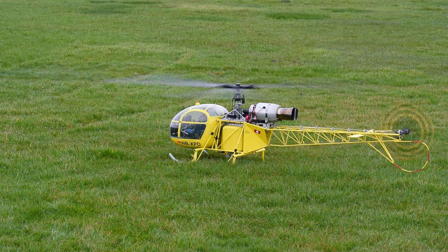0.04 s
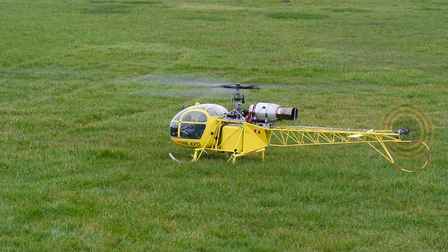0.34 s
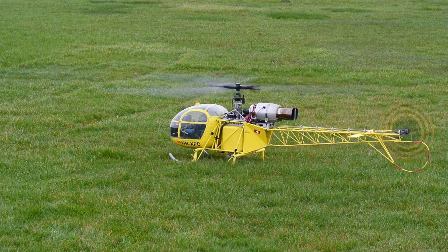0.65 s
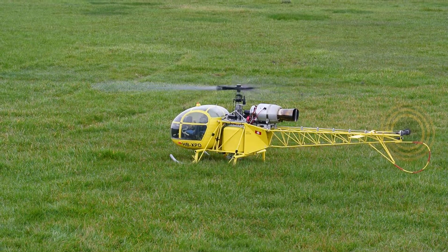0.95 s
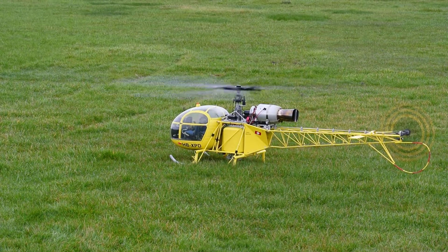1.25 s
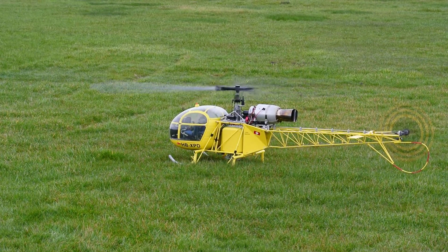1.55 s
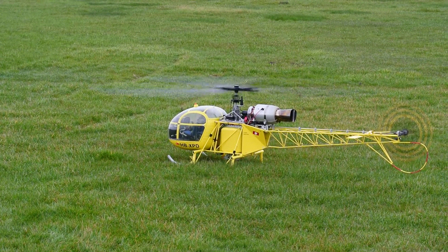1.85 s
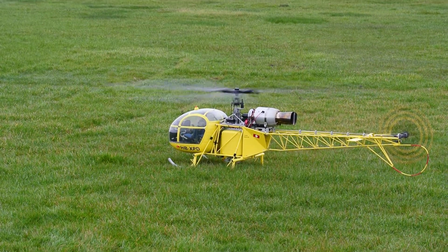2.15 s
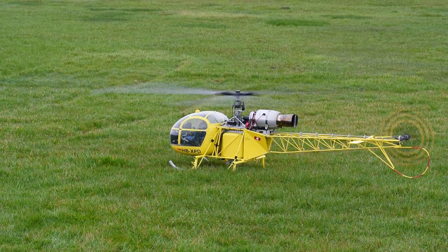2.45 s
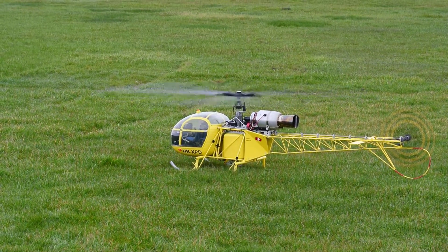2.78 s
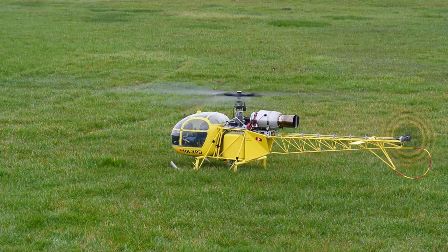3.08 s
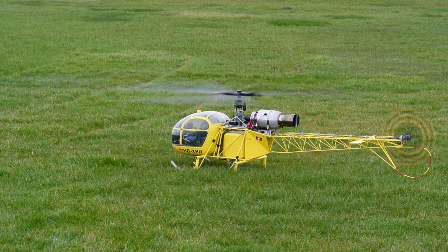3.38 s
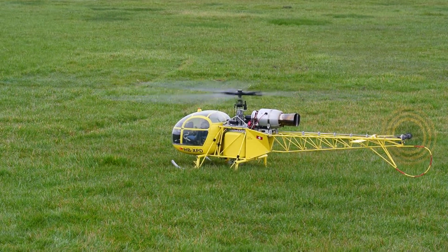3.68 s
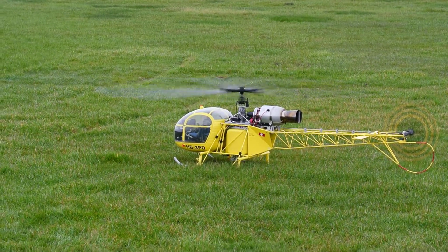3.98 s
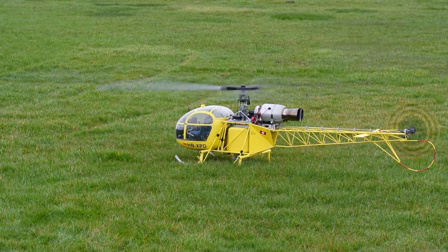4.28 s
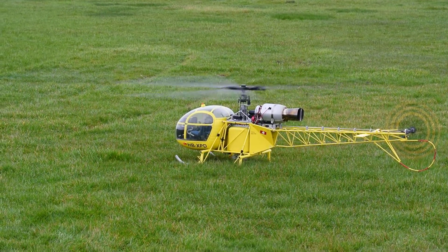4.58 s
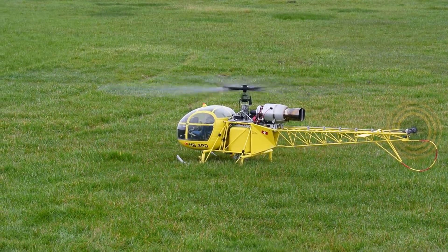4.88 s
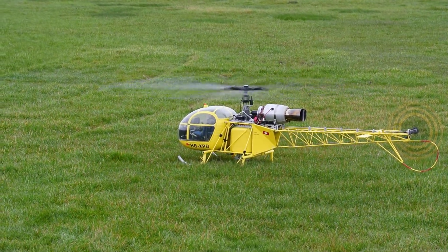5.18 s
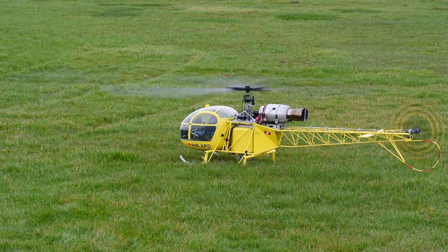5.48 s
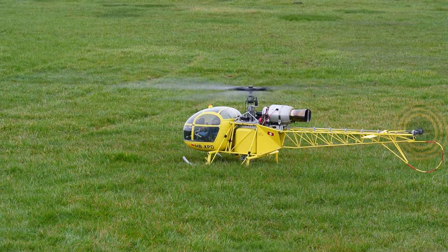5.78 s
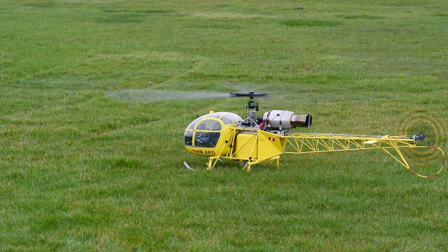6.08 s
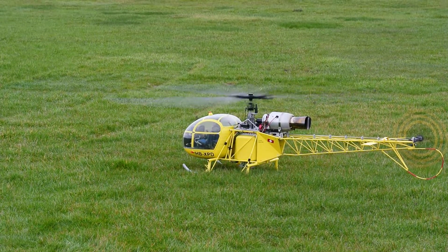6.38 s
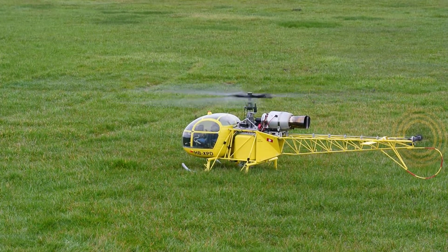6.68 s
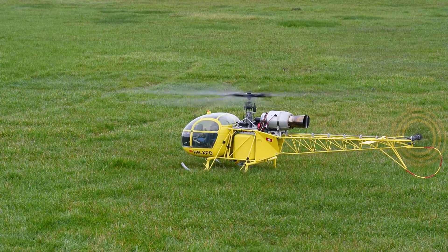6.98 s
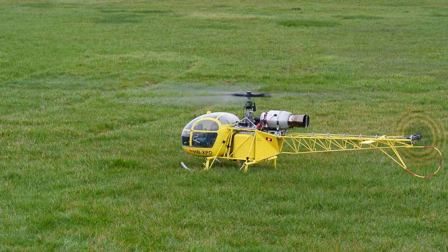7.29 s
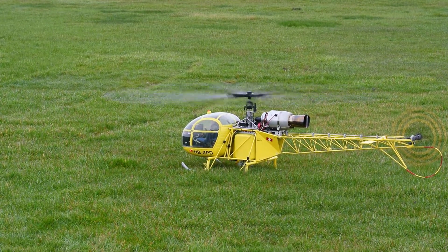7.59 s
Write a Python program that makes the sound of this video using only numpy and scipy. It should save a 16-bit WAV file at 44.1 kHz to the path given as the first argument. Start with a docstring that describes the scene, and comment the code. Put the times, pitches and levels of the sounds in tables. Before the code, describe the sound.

On an open field, a model helicopter's turbine gradually spools up. A continuous jet rush and airy hiss carry a shrill whistle made of a few high tones, which creep upward together from start to finish. The tones waver and trade strength, while the rush stays fairly even, barely pulsed by the rotor. It is heard from one position in front, dry and without reverberation.

```python
"""Model helicopter turbine spooling up

A model helicopter stands on a grass field while its small gas turbine slowly speeds up.
The compressor blades whine at multiples of the shaft speed, over the roar of the exhaust
and the hiss of the intake. The rotor chops the exhaust lightly, and moving air makes
every part swell and fade."""
import sys
import numpy as np
from scipy import signal
from scipy.fft import rfft, irfft, next_fast_len
from scipy.io import wavfile

SR = 44100
rng = np.random.default_rng(int(sys.argv[2]) if len(sys.argv) > 2 else 0)


def store_pcm(level_fs):
    """Save levels as 16-bit WAV."""
    pcm = np.round(np.clip(level_fs, -1, 1) * 32767).astype(np.int16)
    wavfile.write(sys.argv[1], SR, np.atleast_2d(pcm).T)


N = 341323
TIME = np.arange(N) / SR
FFT_SIZE = next_fast_len(N, True)
BIN_HZ = np.maximum(np.fft.rfftfreq(FFT_SIZE, 1 / SR), 1)


def from_db(db):
    """Turn decibels into a gain to multiply by."""
    return 10 ** (np.asarray(db) / 20)


def over_time(table):
    """Join a table's points with straight lines, giving a value for every sample."""
    times, values = np.transpose(table)
    return np.interp(TIME, times, values)


def spectrum_gain(table):
    """Join a table's levels along a pitch scale, giving a gain for every frequency."""
    hz, db = np.transpose(table)
    return from_db(np.interp(np.log(BIN_HZ), np.log(hz), db))


def noise(gain, channels=1):
    """Separate noises, each shaped by the given gain at every frequency."""
    white = rng.standard_normal((channels, FFT_SIZE))
    return irfft(rfft(white) * gain, FFT_SIZE)[:, :N]


def drift(rate_hz, channels=1):
    """A smooth random wobble of typical size 1 that changes at about the given rate."""
    wobble = noise(1 / (1 + (BIN_HZ / rate_hz) ** 2), channels)
    return wobble / np.sqrt(np.mean(wobble ** 2))


# How much the ears differ, against what they share: (frequency [Hz], level [dB])
STEREO_WIDTH = [(35, -8), (70, -13), (150, -21), (290, -16), (400, -22), (550, -11), (730, -17), (860, -11),
                (1600, -20), (2300, -14), (3200, -16), (7000, -11), (10000, -10), (14000, -8)]

def flow_noise(colour):
    """Swirling gas makes noise, nearly alike in both ears, that dies off outside its colour table."""
    low_hz, high_hz = colour[0][0], colour[-1][0]
    edges = (1 + (low_hz / BIN_HZ) ** 24) * (1 + (BIN_HZ / high_hz) ** 24)
    gain = spectrum_gain(colour) / np.sqrt(edges)
    shared = noise(gain)
    difference = noise(gain * spectrum_gain(STEREO_WIDTH))
    return (shared + difference * [[1], [-1]]) / shared.std()


# The turbine shaft speeding up: (time [s], turns per second [Hz])
SHAFT_SPEED = [(0.0, 801), (1.47, 847.5), (2.47, 877.3), (2.97, 889), (3.97, 911), (5.6, 932), (6.01, 942),
               (6.5, 957), (7.06, 982), (7.74, 1017.2)]

def shaft_angle(hunt_hz=5.3, hunt_depth_hz=0.54, wander_hz=0.249):
    """How far the shaft has turned; uneven fuel feed makes its speed hunt up and down a little."""
    hunt = np.sin(2 * np.pi * hunt_hz * TIME + drift(0.99)[0])
    speed = over_time(SHAFT_SPEED) + hunt_depth_hz * hunt + wander_hz * drift(3.9)[0]
    return 2 * np.pi * np.cumsum(speed) / SR


def speed_octaves(middle_hz=900):
    """How many octaves (doublings) the shaft speed is above its middle value."""
    return np.log2(over_time(SHAFT_SPEED) / middle_hz)


# The roar's colour, with dips cut by the echo off the grass: (frequency [Hz], relative level [dB])
ROAR_COLOUR = [(20, -38.1), (50, -28.5), (100, -13.5), (160, -6.5), (240, -3), (300, -9), (380, -2),
               (450, -1.6), (540, -11), (750, -5.5), (880, -14), (1100, -6), (1500, 0.0), (2000, -0.9)]
# The roar surging and easing: (time [s], level [dB])
ROAR_SWELL = [(0.0, -27.5), (0.55, -25.5), (1.07, -28.8), (1.48, -25.5), (2.21, -30.5), (2.74, -30),
              (3.0, -29), (3.32, -31.2), (4.21, -28.5), (4.74, -31), (5.26, -28.5), (6.42, -31),
              (6.63, -27.5), (7.01, -30.5), (7.14, -28.5), (7.74, -31)]

def combustion_roar(chop, chop_db=0.36, dip_hz=970, dip_start_db=-3.5, fill_db_per_s=0.97):
    """Burning fuel roars; the echo off the grass cancels part of one band, which slowly fills in."""
    roar = flow_noise(ROAR_COLOUR)
    band = signal.lfilter(*signal.iirpeak(dip_hz, Q=3.8, fs=SR), roar)
    band_gain = from_db(dip_start_db + fill_db_per_s * TIME)
    roar = roar + (band_gain - 1) * band
    return from_db(over_time(ROAR_SWELL) + chop_db * chop) * roar


# The colour of the exhaust jet: (frequency [Hz], relative level [dB])
JET_COLOUR = [(2000, -1.1), (2800, 0.5), (3250, -0.5), (3700, -6.5), (4200, -7.5), (5000, -3.5),
              (5500, -4.5), (6100, -4), (7000, -6), (7500, -6)]
# The jet swelling and fading: (time [s], level [dB])
JET_SWELL = [(0.0, -24.5), (0.58, -22), (0.92, -22.1), (1.26, -25.3), (1.42, -23.5), (2.82, -25.5),
             (2.97, -24.5), (3.77, -25.5), (3.98, -24), (4.45, -22.5), (4.71, -25.5), (4.96, -25.5),
             (5.15, -23), (6.42, -24.5), (6.6, -23), (6.98, -24), (7.18, -22.3), (7.74, -24.5)]

def exhaust_jet(chop, flicker_db, chop_db=0.1425):
    """Gas rushes out of the exhaust, pulsing slightly as the rotor blades pass over it."""
    return from_db(over_time(JET_SWELL) + chop_db * chop + flicker_db) * flow_noise(JET_COLOUR)


# The colours of the intake air and the fine sizzle above it: (frequency [Hz], relative level [dB])
INTAKE_COLOUR = [(7500, -2), (8200, -2), (8850, 1), (9500, -3), (10000, -4)]
SIZZLE_COLOUR = [(10000, -4.5), (10600, 1.5), (11000, -4.5), (11500, -5), (12800, -2.5), (13700, -8),
                 (14800, -3.5), (15600, -5.5), (17000, -3)]
# Both swelling and fading together: (time [s], relative level [dB])
HISS_SWELL = [(0.0, -26.5), (0.36, -27.5), (0.92, -25.5), (1.34, -29.5), (1.84, -24.5), (2.42, -28.4),
              (2.56, -27.2), (3.88, -27.5), (4.26, -26.5), (4.99, -28), (5.22, -26.5), (5.41, -29),
              (5.65, -25.5), (6.25, -26), (6.46, -28), (6.82, -25.5), (7.0, -26.5), (7.74, -25.5)]

def intake_hiss(flicker_db, intake_db_per_octave=-9, sizzle_db_per_octave=2):
    """Air hisses into the turbine; more speed shifts the sound towards a fine sizzle."""
    hiss_db = over_time(HISS_SWELL) + flicker_db
    intake_db = hiss_db - 0.95 + intake_db_per_octave * speed_octaves()
    sizzle_db = hiss_db + 1.1 + sizzle_db_per_octave * speed_octaves()
    intake = from_db(intake_db) * flow_noise(INTAKE_COLOUR)
    sizzle = from_db(sizzle_db) * flow_noise(SIZZLE_COLOUR)
    return intake + sizzle


def unbalance_hum(angle, middle_db=-57, db_per_octave=30, fade_db=3.5):
    """The unbalanced shaft shakes once a turn, humming louder as it speeds up."""
    level_db = middle_db + db_per_octave * speed_octaves() + fade_db * drift(7.0)
    return np.sqrt(2) * from_db(level_db) * np.sin(angle)


# Faint tones from uneven blades: (multiple of the shaft speed, relative level [dB])
FAINT_TONES = [(3, -42), (9, -58), (10, -58), (13, -58), (14, -58), (15, -57), (16, -59), (17, -58)]

def uneven_blades(angle, gain_db=-8, fade_db=7, flare_at_s=5.63, flare_s=0.11, flare_db=-33):
    """No two blades are alike, so other multiples of the shaft speed sound faintly; one flares up."""
    fades = from_db(fade_db * drift(6.6, channels=len(FAINT_TONES)))
    tones = sum(from_db(db + gain_db) * fade * np.sin(multiple * angle)
                for (multiple, db), fade in zip(FAINT_TONES, fades))
    flare = from_db(flare_db) * bump(flare_at_s, flare_s) * np.sin(15 * angle)
    return np.sqrt(2) * (tones + flare)


def bump(at_s, half_length_s):
    """A bell-shaped rise from 0 to 1 and back."""
    return np.exp(-((TIME - at_s) / half_length_s) ** 2)


def blade_tone(angle, flutter_db, each_ear_db, eddy_db, eddy_hz):
    """A tone flutters in moving air; eddies (small swirls) cut by the blades add noise around it."""
    fading = from_db(flutter_db * drift(13.0) + each_ear_db * drift(1.8, channels=2))
    sine_noise, cosine_noise = drift(eddy_hz, channels=2) * from_db(eddy_db) / np.sqrt(2)
    tone = (1 + sine_noise) * np.sin(angle) + cosine_noise * np.cos(angle)
    return np.sqrt(2) * fading * tone


# The side tone swelling and fading: (time [s], level [dB])
SIDE_SWELL = [(0, -40), (1.5, -45), (3, -40), (5.3, -49), (6.2, -39.5), (7.74, -43)]

def side_tone(angle, multiple=11):
    """A weaker tone sits one multiple of the shaft speed below the strongest whine."""
    tone = blade_tone(multiple * angle, flutter_db=2.5, each_ear_db=5.0, eddy_db=-14, eddy_hz=60)
    return from_db(over_time(SIDE_SWELL)) * tone


def beam_swing(at_s=3.96, swing_s=0.3, swing_db=3.0):
    """Gains for the two ears: the whine's narrow beam leans right, crosses left and settles back."""
    progress = (TIME - at_s) / swing_s
    left_lead_db = swing_db * 2 * progress / (1 + progress ** 2)
    return from_db(left_lead_db * [[0.5], [-0.5]])


# Brief dips in the whine: (time [s], harmonic [1 = main, 2 = high], half-length [s], depth [dB])
WHINE_DIPS = [(.27, 2, .07, 12), (1.3, 2, 0.11, 12), (1.58, 1, .07, 9), (2.75, 1, .11, 13),
              (2.763, 2, .04, 7), (3.96, 1, .035, 10), (5.02, 2, 0.045, 18), (6.51, 1, 0.038, 16)]

def dip_db(harmonic):
    """How far one blade tone briefly drops below its usual level."""
    return sum(depth_db * bump(at_s, half_length_s)
               for at_s, which, half_length_s, depth_db in WHINE_DIPS if which == harmonic)


# The tone of the main blades, fading in the moving air: (time [s], level [dB])
MAIN_SWELL = [(0.0, -36.5), (1.13, -30.5), (1.4, -36), (3.16, -35), (3.63, -41), (4.45, -34.5), (4.77, -26),
              (5.11, -32.5), (5.81, -26.0), (6.4, -30.9), (6.73, -29.5), (7.74, -31)]
# The tone of main and splitter blades together, an octave higher: (time [s], level [dB])
HIGH_SWELL = [(0.0, -35.3), (0.98, -34), (1.11, -26), (1.71, -26.5), (1.87, -28.5), (2.77, -22),
              (4.58, -26), (4.77, -21.2), (5.18, -30.3), (5.4, -24.5), (5.63, -33.3), (5.9, -22.5),
              (6.13, -36.0), (6.29, -24.6), (6.42, -30.5), (6.95, -24.5), (7.11, -34), (7.74, -27.4)]

def compressor_whine(angle, main_blades=6, steady_eddy_db=-42, third_db=-35.5):
    """Six main blades and six short splitter blades between them sing as they push the air."""
    blade_angle = main_blades * angle
    main_db = over_time(MAIN_SWELL) - dip_db(harmonic=1)
    high_db = over_time(HIGH_SWELL) - dip_db(harmonic=2)
    # The eddy noise stays steady, so the main tone turns airy when it fades.
    eddy_db = steady_eddy_db - main_db
    main = blade_tone(blade_angle, flutter_db=1.5, each_ear_db=1.2, eddy_db=eddy_db, eddy_hz=110)
    high = blade_tone(2 * blade_angle, flutter_db=1.3, each_ear_db=0.5, eddy_db=-10, eddy_hz=260)
    third = blade_tone(3 * blade_angle, flutter_db=3.0, each_ear_db=1.0, eddy_db=-5, eddy_hz=90)
    whine = from_db(main_db) * main + from_db(high_db) * high + from_db(third_db) * third
    return beam_swing() * whine


def scene(turns_per_rotor_blade=60):
    """One shaft drives everything; the open field adds no lingering echo."""
    angle = shaft_angle()
    tones = compressor_whine(angle) + uneven_blades(angle) + unbalance_hum(angle) + side_tone(angle)
    chop = np.sin(angle / turns_per_rotor_blade)
    flicker_db = 0.65 * drift(19.0)   # jet and hiss flicker together
    return tones + combustion_roar(chop) + exhaust_jet(chop, flicker_db) + intake_hiss(flicker_db)


def record(dry, cutoff_hz=15750):
    """Cut the highest treble steeply; the whine's third harmonic vanishes as it climbs past the cut."""
    low_pass = signal.ellip(14, 0.1, 90, cutoff_hz, fs=SR, output="sos")
    return signal.sosfilt(low_pass, dry)


dry = scene()
out = record(dry)
store_pcm(out)
```